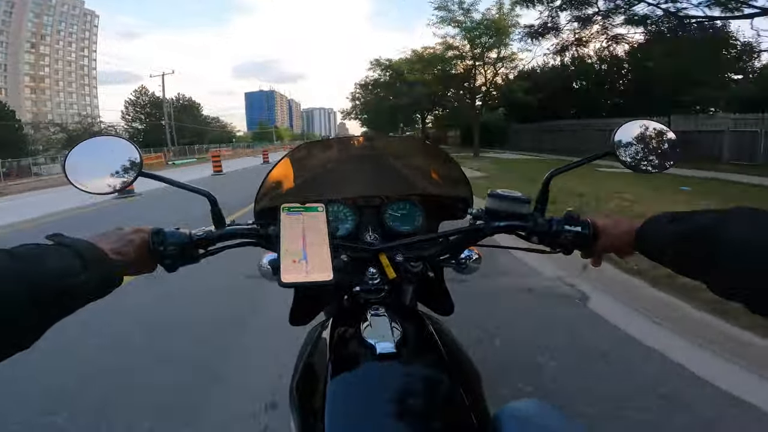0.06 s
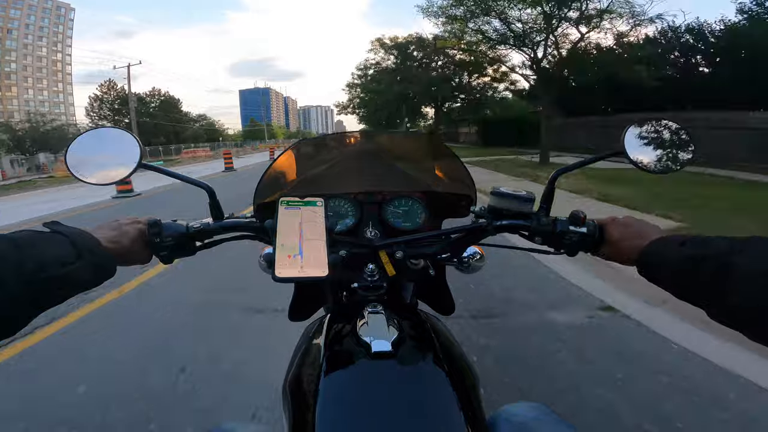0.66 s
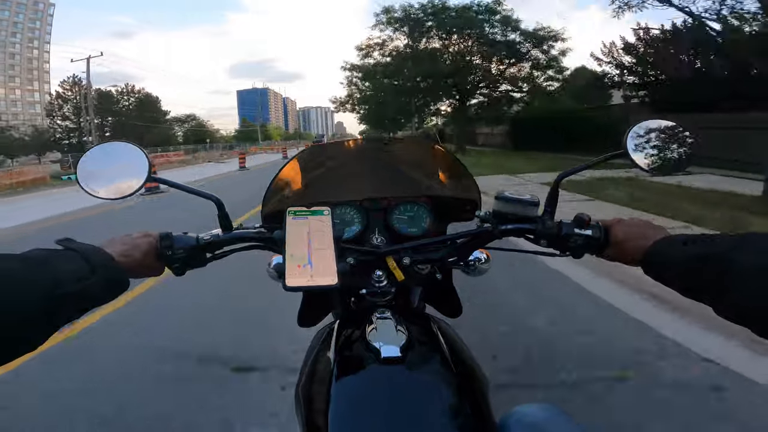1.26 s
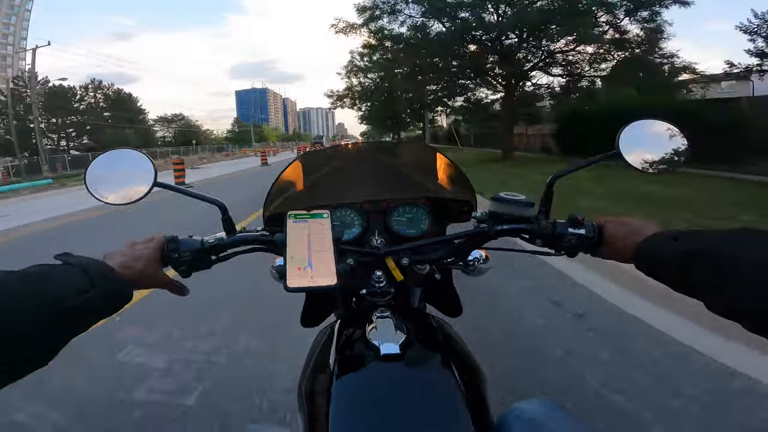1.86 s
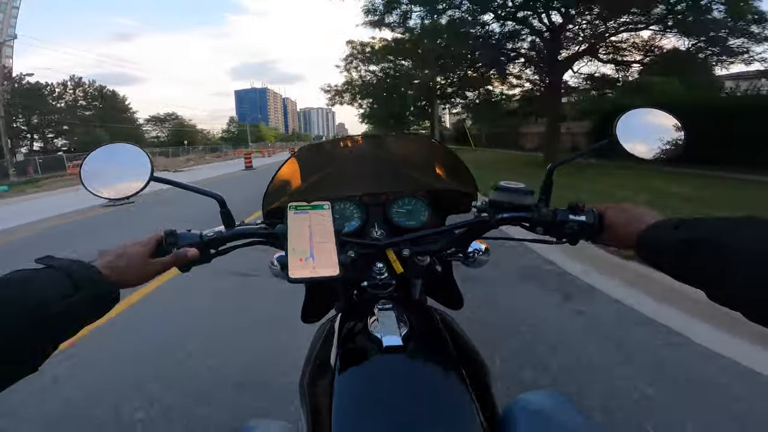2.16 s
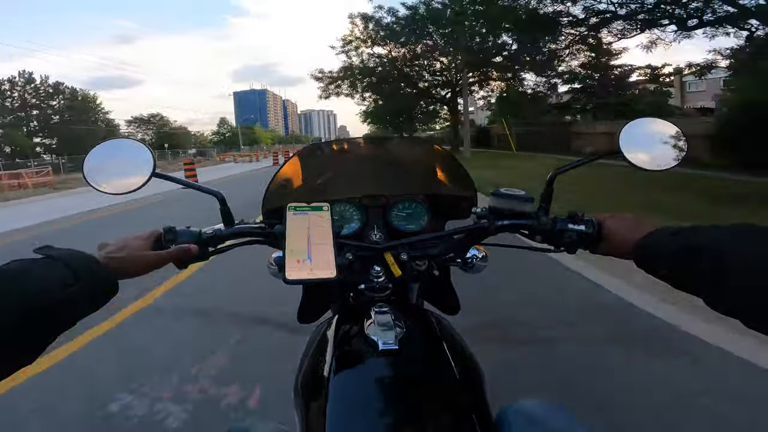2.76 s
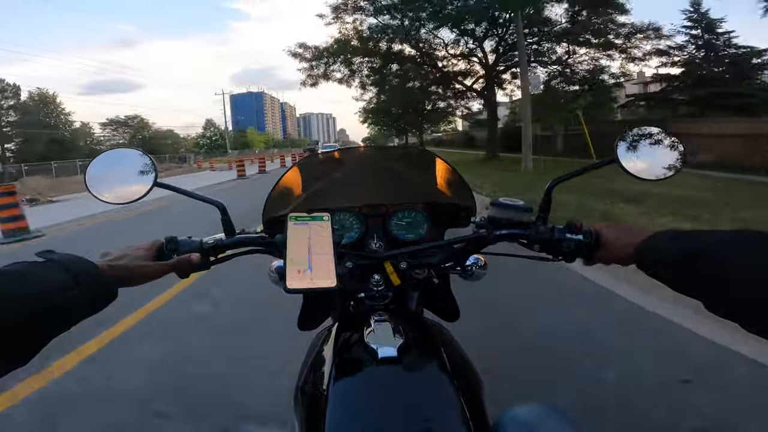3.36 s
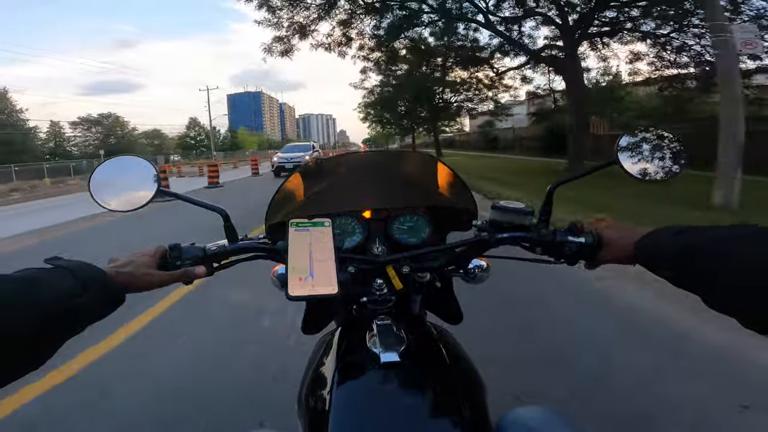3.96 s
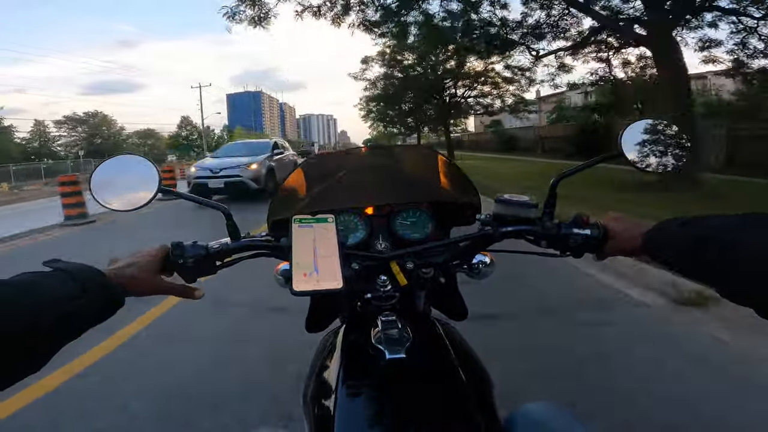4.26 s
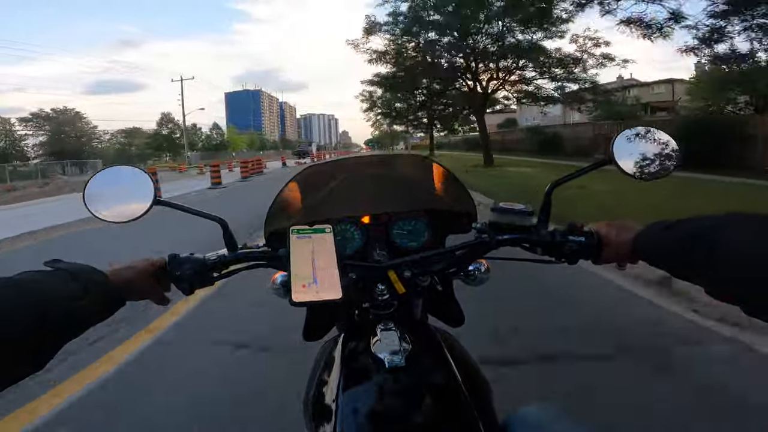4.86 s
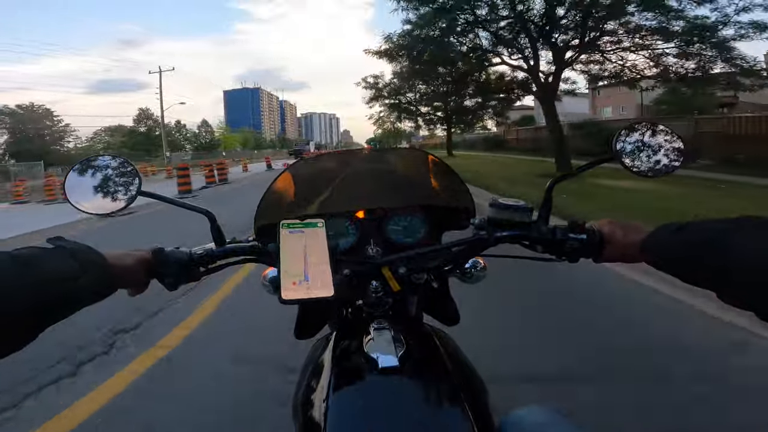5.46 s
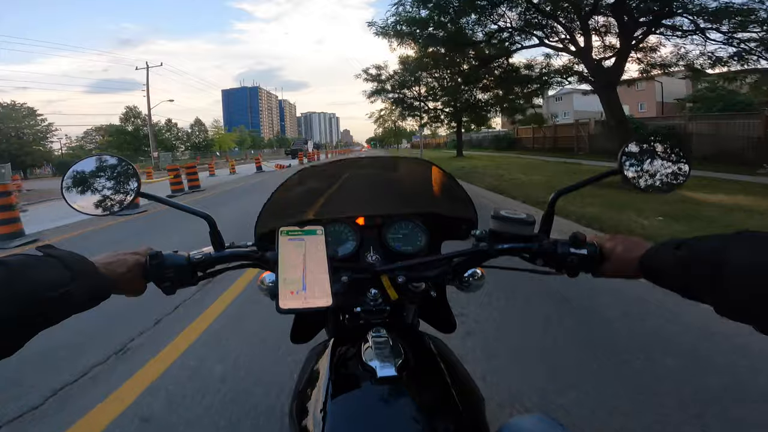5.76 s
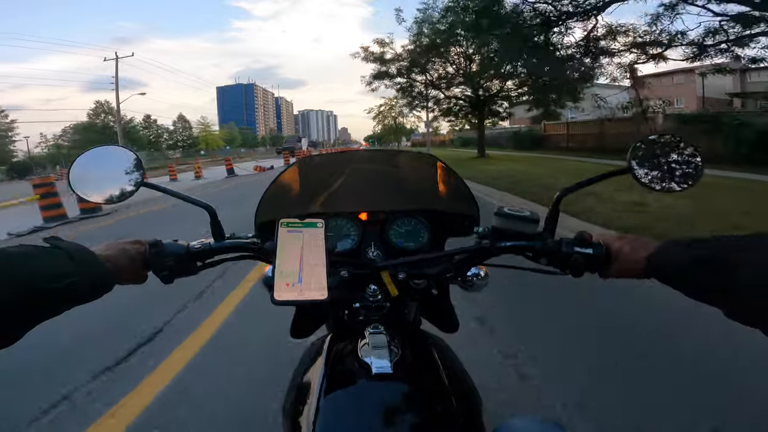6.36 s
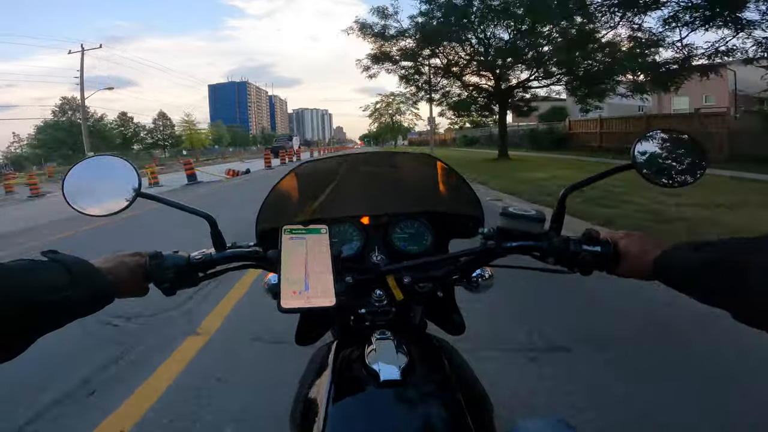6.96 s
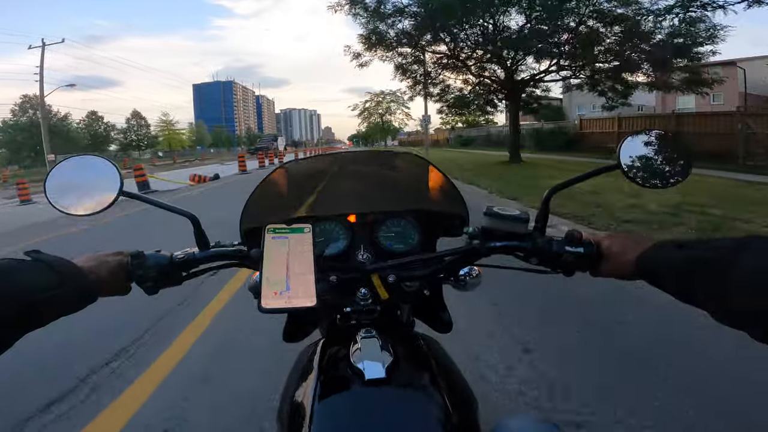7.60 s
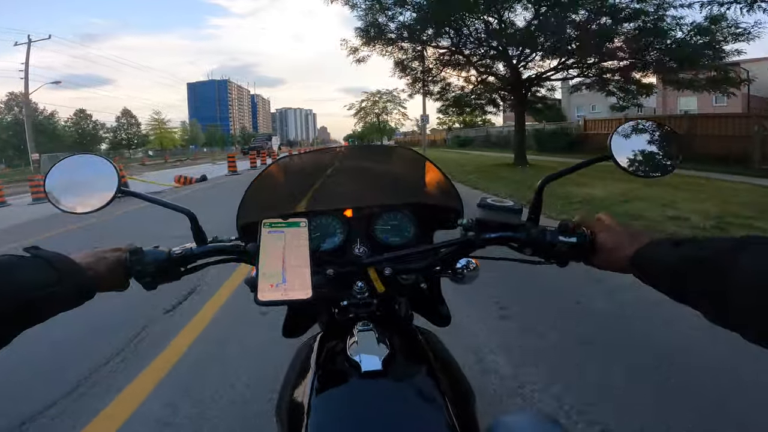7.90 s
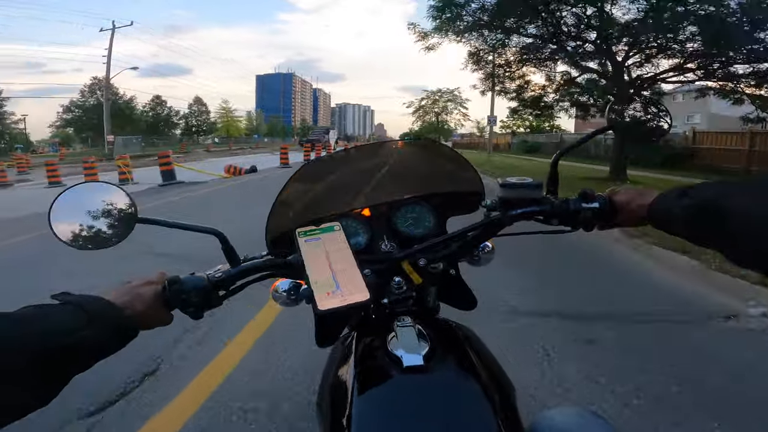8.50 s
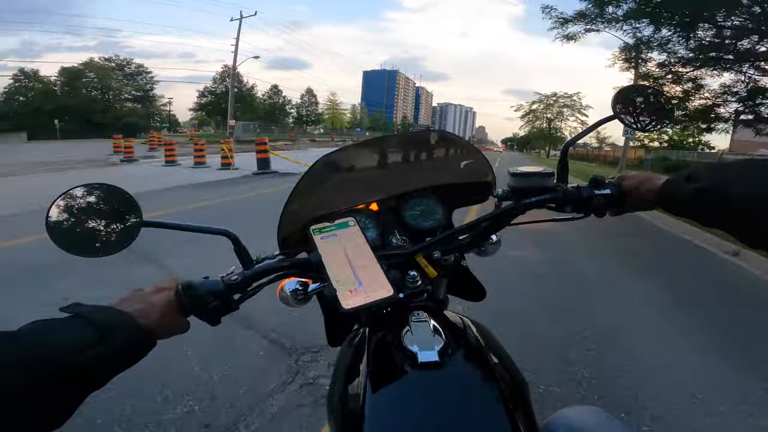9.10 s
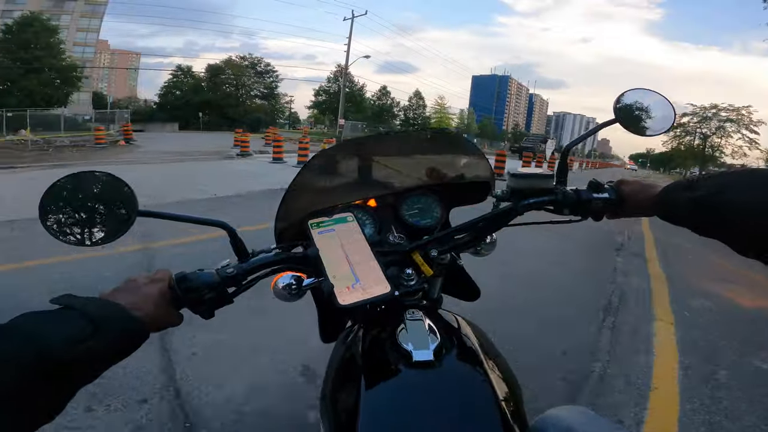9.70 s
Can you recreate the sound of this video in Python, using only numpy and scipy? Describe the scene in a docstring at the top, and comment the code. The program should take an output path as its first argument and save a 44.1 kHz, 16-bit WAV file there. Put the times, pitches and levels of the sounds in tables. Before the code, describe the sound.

A motorcycle cruises at a steady speed, heard from the rider's seat, its exhaust throbbing and engine clattering while gusts buffet the microphone. The throttle shuts, loose parts rattle briefly and an oncoming car passes with a rush of tyres. As the bike slows, the engine is blipped four times, nearly stalling before the last. The wind drops and the engine pulls again.

```python
"""A motorcycle heard from the rider's seat. It starts at a steady speed in gusty wind: the exhaust
throbs, the air intake honks, the engine clatters and loose parts tick. After about 3 seconds the
throttle shuts, a few parts rattle and the bike begins to slow. Near 4.7 seconds a car passes the
other way, its tyres roaring. From 6 seconds come four blips (quick twists of the throttle), with a
near stall before the last. At the end the wind has dropped and the engine pulls again."""
import sys
import numpy as np
from scipy import signal
from scipy.fft import rfft, irfft, next_fast_len
from scipy.io import wavfile
from scipy.ndimage import uniform_filter1d, minimum_filter1d, map_coordinates

SR = 44100
rng = np.random.default_rng(int(sys.argv[2]) if len(sys.argv) > 2 else 0)


def generate_wav(sig):
    """Save sig (samples, or channels by samples) to the path in sys.argv[1] as 16-bit PCM at SR."""
    pcm = np.round(np.clip(np.atleast_2d(sig).T, -1, 1) * 32767).astype(np.int16)
    wavfile.write(sys.argv[1], SR, pcm)


N = 429534
CRUISE_HZ, IDLE_HZ = 36, 25  # engine speed ("revs") in cycles per second

# The tone of each noise. Each row: frequency in Hz, relative level in dB.
HISS_COLOUR = [(6000, -31), (9200, -5.5), (10000, 1.5), (11300, -5), (12700, -2), (13500, -0.5),
               (14200, -5), (15700, -12.5)]
TICK_COLOUR = [(1500, -16), (3000, 8), (3900, 8.5), (4600, -6), (6300, -11), (7000, 1), (7700, -25),
               (11000, -3), (14000, -11)]
TYRE_COLOUR = [(250, -14), (700, 13), (1100, 12.5), (1700, 3), (3000, -27.5), (7000, -26.5)]
BUFFET_COLOUR = [(12, -0.5), (28, -4), (70, -3), (130, -6.5), (250, -9), (500, -23.5), (1500, -50.5),
                 (6000, -72.5)]
WIND_SLAP_COLOUR = [(30, -20), (120, -3.5), (400, 9.5), (800, 1), (1300, -4.5), (2500, -26), (6000, -65)]
INTAKE_COLOUR = [(80, -38), (190, -12.5), (270, -5.5), (315, 6), (380, -6), (470, -9.5), (800, -17.5),
                 (3000, -56.5)]
CLATTER_COLOUR = [(100, -23), (350, 1.5), (600, 2), (850, 8.5), (1300, 4), (1700, -0.5), (2250, -4.5),
                  (3000, -5.5), (4100, -10), (5000, -18), (7600, -21), (9300, -34.5)]
# The notes each part rings at. Each row: pitch in Hz, width in Hz, relative level in dB.
CASE_NOTES = [(541.5, 28.3, 7.5), (686.6, 49, -2)]
BARREL_NOTES = [(985, 74, 1.5), (1052, 91, 0.5), (1175, 40, -5)]  # the cylinder around the piston
FIN_NOTES = [(1458, 100, 10.5), (1837, 150, 2.5), (1980, 18, 11.5), (2146, 120, 1.5), (2449, 61, 7),
             (2596, 44, 7), (3400, 45, 0), (3557, 38, 0), (3816, 64, -2.5), (4130, 66, -11.5),
             (4280, 36, -6.5), (4670, 71, -14), (5470, 43, -16.5), (6060, 59, -12), (7300, 100, -16.5)]  # the cylinder head and its cooling fins
PIPE_NOTES = [(128, 87, -8.5), (183.7, 33, -2)]
SILENCER_NOTES = [(106.5, 6.5, 0)]

# A faint hiss comes up. Each row: time in seconds, base level in dB.
HISS_LEVELS = [(0, -99), (5.3, -90.5), (6.2, -89), (6.8, -93.5), (7.7, -81.5), (8.9, -77), (9.74, -75.5)]
# Small metal ticks. Each row: start in seconds, level in dB.
TICK_HITS = [(0.36, -34.5), (1.95, -26), (5.654, -37)]
# Body panels and levers rattle. Each row: middle in seconds, level in dB, pitch in Hz, fade in seconds.
RATTLE_HITS = [(3.14, -37, 1450, .02), (3.53, -37.5, 1490, 0.031), (4.34, -36.5, 1400, 0.032),
               (4.66, -45, 3330, .03), (8.472, -63, 3100, 0.011), (8.558, -65, 7400, .006)]
# The wind falls as the bike slows. Each row: time in seconds, base level in dB.
WIND_LEVELS = [(0, -19.5), (1.6, -22.5), (2.4, -23.5), (3.6, -24.5), (4.3, -24), (5.1, -24), (5.7, -22.5),
               (7.2, -24.5), (8.3, -34.5), (9.74, -32)]
# Swells of the low rumble: wind gusts early on, thumps from bumps in the road later. Each row: middle in
# seconds, change of level in dB.
RUMBLE_SWELLS = [(.75, 2.5), (1.12, -0.5), (1.35, 4), (1.7, 5), (2.4, 4.5), (4.17, 3.5), (4.75, 2), (6.17, 1),
                 (7.62, 5.5)]
# Short slaps of wind. Each row: start in seconds, strength in dB.
WIND_SLAPS = [(0.552, -12.5), (0.586, -21), (0.721, -16), (0.756, -13), (0.86, -25), (1.052, -29),
              (1.309, -21), (1.457, -19), (1.51, -17.5), (1.679, -22), (1.753, -21), (1.797, -16.5),
              (2.332, -19), (2.624, -16.5), (3.705, -22), (4.179, -29)]

# Revs before the blips. Each row: time in seconds, cycles per second.
REVS_IN_GEAR = [(0.0, 42.47), (0.25, 38.46), (0.42, 34.58), (0.62, 38.1), (0.75, 35.92), (2.0, 37.08),
                (3.26, 38.14), (3.69, 37.43), (3.86, 36.17), (4.04, 37.18), (4.66, 36.01), (5.16, 33.47),
                (5.63, 29.92), (6.13, 27.0)]
# Blips. Each row: start in seconds, climb time in seconds, top revs in cycles per second,
# revs lost each second afterwards, revs they sink toward.
THROTTLE_BLIPS = [(6.172, 0.247, 39.1, 25.26, 24.42), (7.14, 0.194, 35.64, 27.15, 25.3),
                  (7.854, 0.304, 33.8, 70.2, 10.07), (8.505, 0.543, 35.03, 24.5, 25.52)]
# The throttle held open. Each row: start in seconds, end in seconds, opening from 0 to 1.
THROTTLE_PULLS = [(0, .75, .45), (.75, 3.25, .85), (3.25, 3.45, .4), (8.75, 9.4, .65), (9.4, 9.74, 1)]
# The engine's metal. Each row: time in seconds, then base levels in dB of cases, head clatter and fins.
METAL_LEVELS = [(0, -29.5, -36.5, -41), (.9, -36, -37, -42.5), (2.9, -39, -38.5, -41),
                (4.2, -33, -37, -43.5), (4.9, -32.5, -39, -40.5), (6.4, -29.5, -37.5, -42),
                (7.3, -30.5, -38.5, -40.5), (7.7, -32.5, -39.5, -45.5), (8.2, -31.5, -40, -42.5),
                (8.46, -35.5, -51, -38), (8.85, -30.5, -39, -41), (9.74, -39.5, -42, -44.5)]
# The piston's knock. Each row: time in seconds, base level in dB.
PISTON_LEVELS = [(0, -37.5), (.35, -41), (.6, -36), (1.9, -40.5), (2.4, -35), (2.8, -41), (3, -35.5),
                 (3.5, -37), (4, -40.5), (4.25, -46), (4.6, -34.5), (5.2, -36.5), (5.6, -36.5), (6.05, -36),
                 (6.27, -29.5), (6.55, -38), (7, -36.5), (7.23, -34), (7.75, -42), (8.15, -36.5),
                 (8.5, -44), (8.9, -40), (9.74, -46.5)]
# The loudness of the steady exhaust throb and its ragged sputter over time.
# Each row: time in seconds, gain of the even throb in dB, gain of the uneven sputter in dB.
FIRING_LEVELS = [(0, -2, -20.5), (.7, -2, -23), (1, -1, -22.5), (2.9, 0, -28), (3.7, -0.5, -26),
                 (4.1, -1, -18), (5, -2.5, -21), (5.5, -2.5, -24), (6, -3, -19), (6.45, 1, -25.5),
                 (6.85, -3.5, -17.5), (7.33, 1, -21.5), (7.65, -2, -26), (8.1, 0, -19), (8.42, -2, -26.5),
                 (8.63, 1, -25), (8.85, 1.5, -26), (9.1, 2, -46), (9.4, 0, -26.5), (9.74, 0, -28)]
# Strong harmonics (whole multiples of the revs). Each entry: harmonic number, boost in dB.
HARMONIC_BOOSTS = {2: 10, 3: 0.35, 4: 13.14, 5: 13.1, 6: 9.7, 7: 4.5, 8: 7.4, 9: 3.6, 11: 1.4, 12: 2.3, 13:
                   6.2}
# The exhaust's tone with the throttle shut. Each row: frequency in Hz, base level of a harmonic in dB.
SHUT_TONE = [(50, -52), (75, -42.5), (100, -32.5), (125, -31), (150, -31.5), (175, -30), (200, -32.5),
             (230, -34.5), (260, -43.5), (305, -47), (335, -47.5), (375, -43.5), (430, -49)]
# The honk that full throttle adds. Each row: frequency in Hz, change of level in dB.
OPEN_HONK = [(55, 6.5), (100, -5), (150, -0.5), (220, -5), (260, 3.5), (305, 20), (350, 1), (430, -8.5)]


def amp(db):
    """Turn decibels into a gain."""
    return 10 ** (np.asarray(db) / 20)


def unit(x):
    """Scale a signal to an average (rms) level of 1."""
    return x / np.sqrt(np.mean(x ** 2) + 1e-20)


def curves(rows):
    """Turn each column after the time into one value per sample."""
    s, *cols = np.transpose(rows)
    return [np.interp(np.arange(N) / SR, s, c) for c in cols]


def wobble(rate):
    """A smooth random curve through `rate` points a second."""
    return map_coordinates(rng.standard_normal(int(N * rate / SR) + 4), [np.arange(N) * rate / SR])


def noise():
    """White noise."""
    return rng.standard_normal(N)


def filtered(x, response):
    """Pass x through a filter, given as a function of frequency."""
    size = next_fast_len(N + SR // 2)
    return irfft(rfft(x, size) * response(np.fft.rfftfreq(size, 1 / SR)), size)[:N]


def coloured(x, colour):
    """Give x the tone in a colour table, at level 1."""
    freqs, db = np.transpose(colour)
    return unit(filtered(x, lambda hz: amp(np.interp(np.log(hz + 1), np.log(freqs), db))))


def resonance(hz, centre, width):
    """How one ringing note answers each frequency; a narrow one rings longer."""
    return 1j * hz * width / (centre ** 2 - hz ** 2 + 1j * hz * width)


def ring(x, notes):
    """Let x set a part's notes ringing, at level 1."""
    return unit(filtered(x, lambda hz: sum((-1) ** k * amp(db) * resonance(hz, centre, width)
                                           for k, (centre, width, db) in enumerate(notes))))


def strokes(cycles, scatter_db, count):
    """Clicks of uneven size, `count` in each engine cycle."""
    at = np.flatnonzero(np.diff(np.floor(cycles * count)) > 0)
    return np.bincount(at, amp(scatter_db * rng.uniform(-1, 1, len(at))), N)


def bursts(hits, fade_s, bed):
    """Noise that flares at each click and fades, over a steady bed of noise."""
    flare = signal.lfilter([1], [1, -np.exp(-1 / (fade_s * SR))], hits)
    return noise() * (bed + unit(flare))


def hiss(revs, cycles, db_per_octave=8, flutter_db=3):
    """A very faint, high hiss comes up late and flutters."""
    base_db, = curves(HISS_LEVELS)
    swell_db = db_per_octave * np.log2(revs / CRUISE_HZ)
    swing_db = flutter_db * np.cos(2 * np.pi * cycles)
    return amp(base_db + swell_db + swing_db + 1.5 * wobble(8.4)) * coloured(noise(), HISS_COLOUR)


def rattles(width_share=0.092):
    """Each loose part buzzes briefly around its own pitch."""
    t = np.arange(N) / SR
    return sum(amp(db) * np.exp(-((t - s) / fade_s) ** 2) * ring(noise(), [(hz, width_share * hz, 0)])
               for s, db, hz, fade_s in RATTLE_HITS)


def ticks(fade_s=.004):
    """Loose metal parts click now and then."""
    t = np.arange(N) / SR
    flare = sum(amp(db) * (t >= s) * np.exp(-np.abs(t - s) / fade_s) for s, db in TICK_HITS)
    return flare * coloured(noise(), TICK_COLOUR)


def passing_car(nearest_s=4.72, span_s=0.39, db=-35.5):
    """The tyres of an oncoming car roar loudest when it is nearest."""
    distance = np.hypot(1, (np.arange(N) / SR - nearest_s) / span_s)
    return amp(db) * coloured(noise(), TYRE_COLOUR) / distance


def wind(swell_fade_s=0.14, slap_rise_s=0.0036):
    """Gusty wind buffets the microphone and slaps when a swirl of air breaks on it; bumps in the road thump
    through the rumble."""
    t = np.arange(N) / SR
    base_db, = curves(WIND_LEVELS)
    gust_db = sum(db * np.exp(-((t - s) / swell_fade_s) ** 2) for s, db in RUMBLE_SWELLS)
    rumble = unit(coloured(noise(), BUFFET_COLOUR) * amp(0.31 * wobble(23)))
    slaps = np.zeros(N)
    for s, db in WIND_SLAPS:
        age = np.maximum(t - s, 0) / slap_rise_s
        slaps += amp(db) * np.sqrt(age) * np.exp(-age / 2)
    return amp(base_db + gust_db) * rumble + slaps * coloured(noise(), WIND_SLAP_COLOUR)


def throttle(lead_s=0.15, climb_share=0.43, lag_s=0.15):
    """The opening from 0 to 1, held for a pull or snapped for a blip; the engine answers a little late."""
    t = np.arange(N) / SR
    # a blip opens before the revs climb and shuts part of the way up
    snaps = [(start - lead_s, start + climb_share * rise, 1) for start, rise, *_ in THROTTLE_BLIPS]
    twists = [opening * ((t >= on) & (t < off)) for on, off, opening in list(THROTTLE_PULLS) + snaps]
    keep = np.exp(-1 / (lag_s * SR))
    return signal.lfilter([1 - keep], [1, -keep], np.max(twists, axis=0))


def engine_revs(flywheel_s=.05):
    """Engine cycles per second: steady, then slowing; each blip climbs and coasts back down."""
    t = np.arange(N) / SR
    revs, = curves(REVS_IN_GEAR)
    for start, rise, top, fall, bottom in THROTTLE_BLIPS:
        age, low = t - start, np.interp(start, t, revs)
        climb = low + (top - low) * np.sin(np.pi / 2 * age / rise)
        coast_s = np.hypot(age - rise, flywheel_s) - flywheel_s  # the flywheel rounds off the top
        coast = bottom + np.logaddexp(0, top - bottom - fall * coast_s)
        revs = np.select([age < 0, age < rise], [revs, climb], coast)
    return revs


def intake(cycles, opening, shut_db=-19, open_rise_db=17):
    """The engine gulps air twice a cycle, loudest with an open throttle and uneven firing."""
    _, uneven_db = curves(FIRING_LEVELS)
    gulps = bursts(strokes(cycles, scatter_db=4, count=2), fade_s=0.00099, bed=5.2)
    return amp(uneven_db + shut_db + open_rise_db * opening) * coloured(gulps, INTAKE_COLOUR)


def case_hum(revs, cycles, db_per_octave=3.5, throb_db=2):
    """The engine's metal cases hum, swelling once a cycle and growing with the revs."""
    base_db, _, _ = curves(METAL_LEVELS)
    shaking = noise() * amp(throb_db * np.cos(2 * np.pi * (cycles - 0.23)))
    revs_db = db_per_octave * np.log2(revs / CRUISE_HZ)
    return amp(base_db + revs_db + wobble(6.6)) * ring(shaking, CASE_NOTES)


def piston_slap(cycles, scrape=1.5):
    """The piston knocks and scrapes once a cycle, making its barrel ring."""
    base_db, = curves(PISTON_LEVELS)
    knocks = strokes(cycles - .3, scatter_db=2.5, count=1)
    scrapes = scrape * unit(bursts(knocks, fade_s=0.011, bed=0.5))
    return amp(base_db + wobble(11)) * ring(unit(knocks) + scrapes, BARREL_NOTES)


def valve_clatter(revs, cycles, opening, db_per_octave=5, load_db=0.5, throb_db=0.5):
    """Valves tap the cylinder head four times a cycle and ring its fins, louder at high revs."""
    _, head_db, fins_db = curves(METAL_LEVELS)
    taps = strokes(cycles, scatter_db=5.5, count=4)
    head = amp(head_db) * coloured(bursts(taps, fade_s=0.0051, bed=1.8), CLATTER_COLOUR)
    fins = amp(fins_db) * ring(bursts(taps, fade_s=0.0057, bed=1), FIN_NOTES)
    effort_db = db_per_octave * np.log2(revs / CRUISE_HZ) + load_db * opening
    return amp(effort_db + throb_db * np.cos(2 * np.pi * cycles)) * (head + fins)


def silencer_boom(revs, cycles, db=-19, steepness=2.8):
    """When the revs sag below idle, the silencer booms on between the putts."""
    stalling = np.clip(steepness * (1 - revs / IDLE_HZ), 0, 1)
    return amp(db) * stalling * ring(strokes(cycles, scatter_db=10.5, count=2), SILENCER_NOTES)


def exhaust_puffs(cycles, gain_db=-4):
    """Uneven firing adds low, hollow puffs from the pipe."""
    _, uneven_db = curves(FIRING_LEVELS)
    puffs = strokes(cycles, scatter_db=2.5, count=2) * np.sign(noise())
    hollow = ring(ring(puffs, PIPE_NOTES), PIPE_NOTES)  # twice, for a steeper filter
    return amp(uneven_db + gain_db) * hollow


def exhaust_drone(revs, cycles, opening, odd_db_per_octave=11, even_db_per_octave=1, spread=0.523):
    """One throb a cycle, built from harmonics shaped by the exhaust; the odd ones fade toward idle."""
    even_db, uneven_db = curves(FIRING_LEVELS)
    octaves = np.log2(np.maximum(revs, IDLE_HZ) / CRUISE_HZ)
    # uneven firing comes a little early or late
    fired = cycles + 0.02 * amp(uneven_db - uneven_db.max()) * wobble(45)
    drone = np.zeros(N)
    for harmonic in range(2, 17):
        hz = harmonic * revs
        shut_db = np.interp(hz, *np.transpose(SHUT_TONE))
        honk_db = opening * np.interp(hz, *np.transpose(OPEN_HONK))
        revs_db = octaves * (odd_db_per_octave if harmonic % 2 else even_db_per_octave)
        waver_db = .13 * harmonic * wobble(24)  # higher harmonics waver more
        db = HARMONIC_BOOSTS.get(harmonic, 0) + shut_db + honk_db + revs_db + waver_db
        # the silencer draws each throb out into a falling sweep; at speed the throbs merge
        sweep = spread * (revs / CRUISE_HZ) ** 3 * (harmonic - 5) ** 2
        drone += np.sqrt(2) * amp(db) * np.cos(2 * np.pi * harmonic * fired + sweep)
    return amp(even_db) * drone


def scene(treble_cut_hz=8500):
    """Mix the background with the engine, dull the top treble, then add the faint, high hiss."""
    revs, opening = engine_revs(), throttle()
    cycles = .065 + np.cumsum(revs) / SR + .003 * wobble(18)  # engine cycles counted so far
    background = rattles() + ticks() + passing_car() + wind()
    metal = case_hum(revs, cycles) + piston_slap(cycles) + valve_clatter(revs, cycles, opening)
    exhaust = silencer_boom(revs, cycles) + exhaust_puffs(cycles) + exhaust_drone(revs, cycles, opening)
    mix = background + intake(cycles, opening) + metal + exhaust
    dulled = filtered(mix, lambda hz: 1 / np.hypot(1, (hz / treble_cut_hz) ** 11))
    return (dulled + hiss(revs, cycles))[None]


def record(dry):
    """A fast limiter turns down the loudest peaks, then the very highest treble is cut off."""
    ceiling, window, top_hz = .54, 1323, 15700  # the window is in samples (30 ms)
    needed = np.minimum(1, ceiling / (np.abs(dry[0]) + 1e-9))
    gain = uniform_filter1d(minimum_filter1d(needed, size=window), size=window)
    return filtered(dry[0] * gain, lambda hz: hz < top_hz)[None]


dry = scene()
out = record(dry)
generate_wav(out)
```